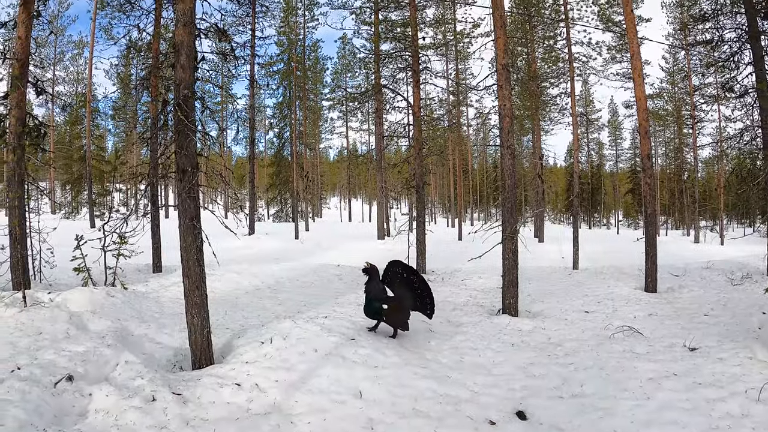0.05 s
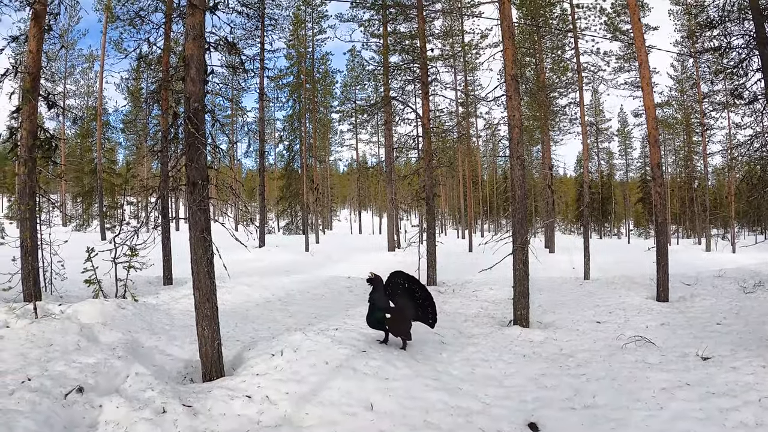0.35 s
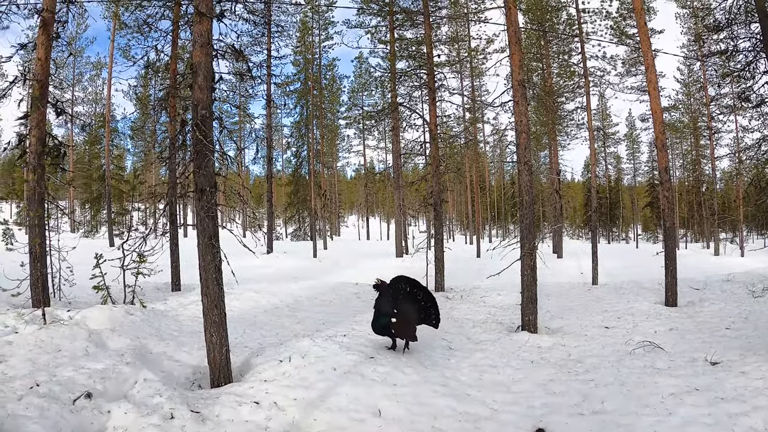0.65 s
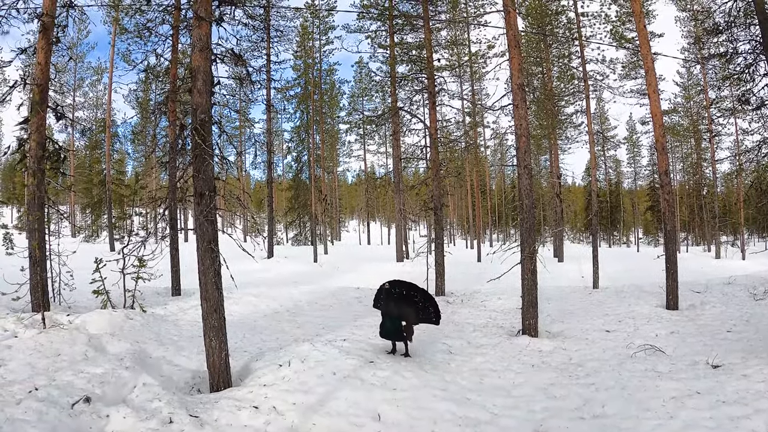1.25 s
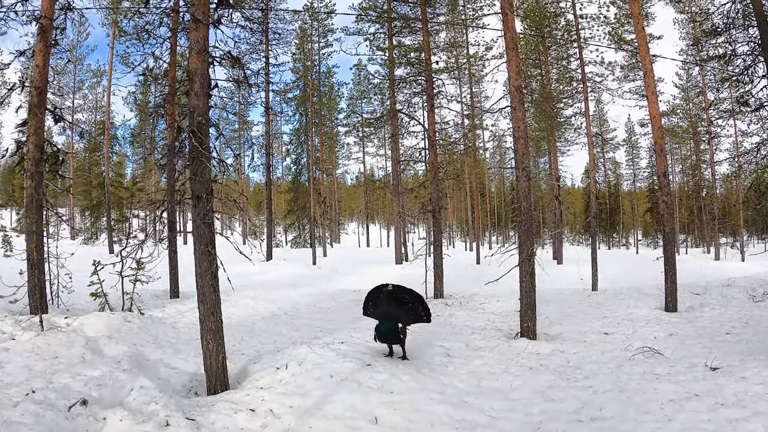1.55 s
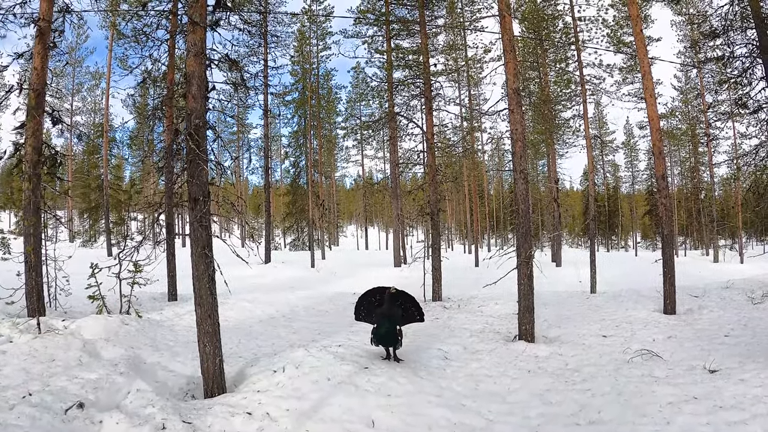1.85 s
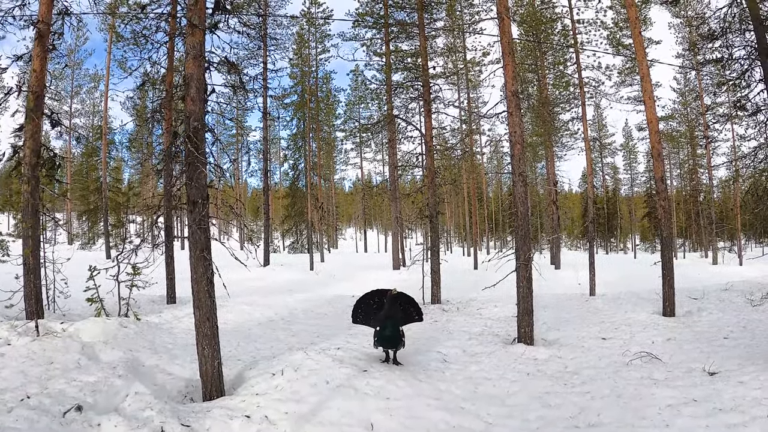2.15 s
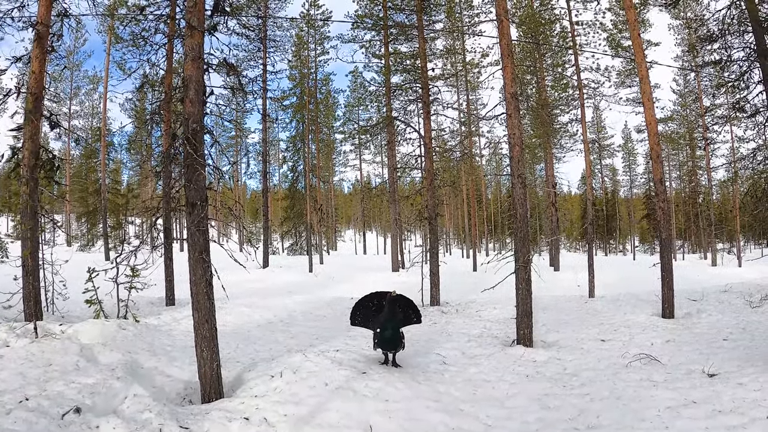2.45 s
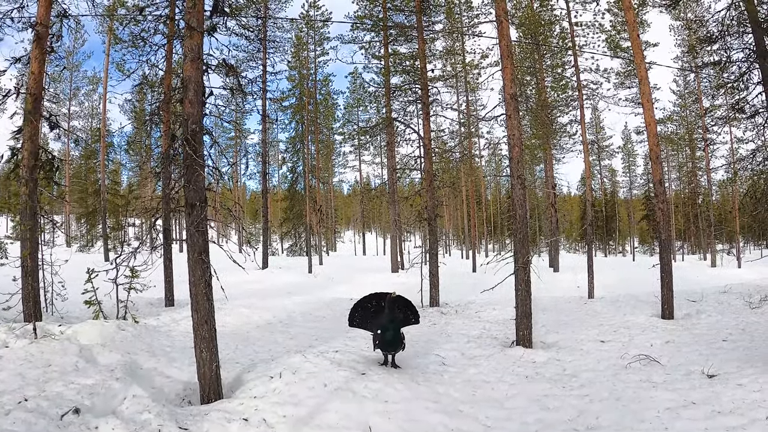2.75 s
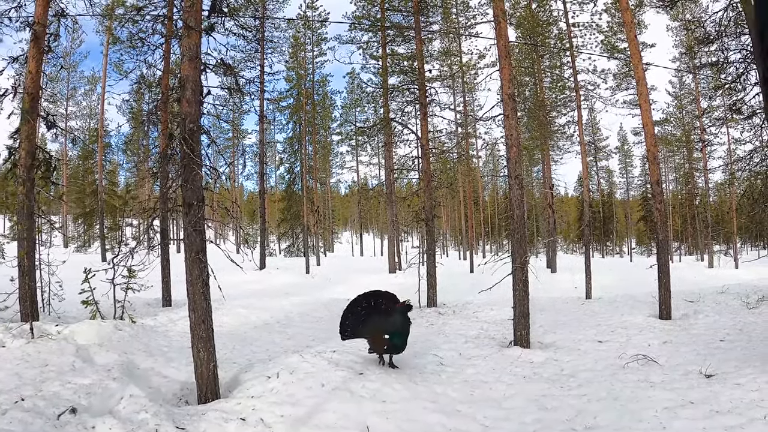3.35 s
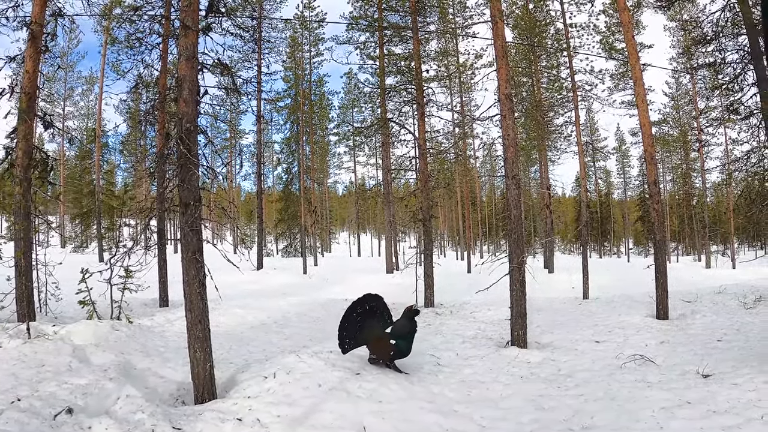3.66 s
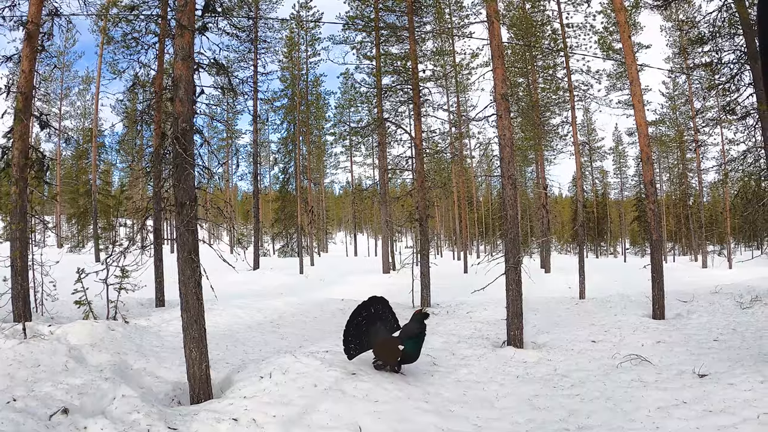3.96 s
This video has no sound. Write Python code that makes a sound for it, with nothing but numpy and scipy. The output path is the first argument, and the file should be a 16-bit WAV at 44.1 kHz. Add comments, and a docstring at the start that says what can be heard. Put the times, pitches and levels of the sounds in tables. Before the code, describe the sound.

A large forest bird's sharp, cork-like pop over low wind rumble and faint snow crunches.

```python
"""Capercaillie on old snow

A displaying capercaillie struts through a pine forest, a few metres away. One call is just ending;
the next is a cork-like pop: two snaps ring the bill over a hollow throat note, then tiny squeaks.
Feathers flick, feet crunch the crust and the trunks return a faint echo.
Wind hushes in the crowns and buffets the microphone."""
import sys
import numpy as np
from scipy import signal
from scipy.fft import rfft, irfft, next_fast_len
from scipy.io import wavfile
from scipy.ndimage import uniform_filter1d, map_coordinates

SR = 44100
rng = np.random.default_rng(int(sys.argv[2]) if len(sys.argv) > 2 else 0)


def store_pcm(level_fs):
    """Save levels as 16-bit WAV."""
    pcm = np.round(np.clip(level_fs, -1, 1) * 32767).astype(np.int16)
    wavfile.write(sys.argv[1], SR, np.atleast_2d(pcm).T)


N = 176400
LEAD_S = .05  # pre-roll for the call already under way; scene() trims it off

# gritty noise colour of the snaps and squeaks: (frequency [Hz], level [dB])
RASP = [(900, -29), (1600, -11.5), (2300, 2.5), (4200, 3), (5600, -22), (9000, -15), (15500, -28)]
# crisp noise colour of the snow crust, also used for feathers: (frequency [Hz], level [dB])
CRUST = [(700, -13.5), (1500, 2), (2800, -1), (4600, 0.5), (6000, -3), (10000, -3), (15500, -6)]


def pop():
    """Each snap is a sharp click that rings the bill; the hollow throat note swells just after it."""
    # snaps: (time [s], ring [dB], tilt [dB/octave], click [dB], throat note [dB], ring pitch [ratio])
    snaps = [(-.032, -16.5, -2, -33, -58, 1), (1.9671, -20.5, 5, -12.5, -29.5, 1.02),
             (1.9758, -22, 2.5, -33, -50, .985)]
    # resonances of the bill and throat: (frequency [Hz], level [dB], t60 [s])
    modes = [(1300, -10.5, .008), (1820, -2, .012), (2200, 5.5, .012), (2700, -4.5, .012),
             (3530, -17, .008), (4000, -9.5, .012), (4900, -17, .0098), (6150, -18.5, .009),
             (7450, -28.5, .011), (8850, -27.5, .007), (10400, -33, .006)]
    # dips between the throat's resonances: (frequency [Hz], width [Hz])
    hollows = [(1000, 150), (5650, 400), (6850, 200)]
    pivot_hz, attack_s, crack_db, crack_t60_s = 2120, .00034, -17, .0063
    click_hz, click_lag_s, click_width_s = 2600, .0006, .00014
    throat_hz, throat_lag_s, throat_length_s = 440, .0045, .007
    bill, throat = np.zeros(N), np.zeros(N)
    for s, ring_db, tilt_db, click_db, throat_db, pitch in snaps:
        since = np.arange(N) / SR - s - LEAD_S
        t, click_t = np.maximum(since, 0), since - click_lag_s
        ring = sum(amp(db + tilt_db * np.log2(hz / pivot_hz) - 60 * t / t60)
                   * np.sin(2 * np.pi * pitch * hz * t) for hz, db, t60 in modes)
        crack = amp(crack_db + tilt_db - 60 * t / crack_t60_s) * noise(RASP)
        click = np.exp(-np.abs(click_t) / click_width_s) * np.cos(2 * np.pi * click_hz * click_t)
        bill += amp(ring_db) * (ring + crack) * (1 - np.exp(-t / attack_s)) + amp(click_db) * click
        bloom = swell(s + LEAD_S + throat_lag_s, throat_length_s)
        throat += amp(throat_db) * bloom * np.sin(2 * np.pi * throat_hz * t)
    for hz, width in hollows:
        bill = signal.lfilter(*signal.iirnotch(hz, hz / width, fs=SR), bill)
    low_cut = signal.butter(2, 1290, "high", fs=SR, output="sos")  # the bill's ring keeps little below about 1.3 kHz
    return signal.sosfilt(low_cut, bill) + throat


def squeaks():
    """Very short, raspy, gliding notes with overtones shaped by the throat."""
    # squeaks: (centre [s], length [s], pitch [Hz], glide [share of pitch/s], level [dB], overtones [dB])
    notes = [(.007, .0078, 2160, 5, -28, -7.5), (.015, .0093, 2170, -3, -41.5, -24),
             (.0219, .0058, 1353, -10, -41, 2.5), (1.9917, .0058, 1770, -7, -33.5, 5),
             (2.0018, .0078, 1960, -7, -35, -2.5)]
    # how the throat passes the overtones: (frequency [Hz], gain [dB])
    formants = [(2600, 1.5), (3500, -6), (4100, -11), (5350, -18), (5900, -45), (7100, -29), (7800, -36),
                (8800, -22), (9900, -51)]
    jitter, rasp_db = .018, -23
    out, t = np.zeros(N), np.arange(N) / SR - LEAD_S
    for s, length, hz, glide, db, overtones_db in notes:
        pitch = hz * (1 + glide * np.clip(t - s, -length, length) + jitter * wobble(900))
        phase = 2 * np.pi * np.cumsum(pitch) / SR
        overtones = sum(amp(along(formants, k * hz)) * np.sin(k * phase) for k in range(2, 6))
        voice = np.sin(phase) + amp(overtones_db) * overtones + amp(rasp_db) * noise(RASP)
        out += amp(db) * swell(s + LEAD_S, length, order=4) * voice
    return out


def feathers():
    """A brief dry rustle as the neck jerks around the pop."""
    # flicks of the neck feathers: (centre [s], length [s], level [dB])
    flicks = [(1.948, .016, -67), (1.989, 0.032, -59), (2.031, .03, -65)]
    return sum(amp(db) * swell(s, length) for s, length, db in flicks) * noise(CRUST)


def steps():
    """Bursts of grains at each footfall, and a thin crackle while the bird walks."""
    # feet and wing tips crunching the crust: (centre [s], length [s], level [dB])
    crunches = [(.06, .085, -68.5), (.211, .018, -66), (.277, .024, -68), (.334, .02, -70.5),
                (.386, .005, -67), (.399, .008, -70), (.408, .0055, -62), (.528, .014, -67.5),
                (.798, .013, -58.5), (.862, .085, -71.5), (.924, .009, -65), (.94, .02, -65),
                (.976, .01, -68), (.994, .03, -70), (1.096, .005, -63), (1.106, .009, -60.5),
                (1.152, .012, -58.5), (1.179, .012, -67.5), (3.275, .01, -63), (3.291, .02, -64.5),
                (3.424, .032, -71), (3.467, .03, -68), (3.513, .008, -55.5), (3.54, .02, -65),
                (3.563, .012, -52.5), (3.798, .012, -60.5), (3.82, .035, -67.5), (3.9, .11, -68),
                (3.931, .022, -66)]
    # spells of walking with rustling feathers: (start [s], end [s], level [dB])
    walks = [(0, 0.64, -86), (0.777, 1.238, -81.5), (3.397, 4.04, -81)]
    t = np.arange(N) / SR
    pressure = sum(amp(db) * swell(s, length) for s, length, db in crunches)
    walking = sum(amp(db) * ((t > start) & (t < end)) for start, end, db in walks)
    crunch = pressure * grains(per_s=4500, spread_db=2)
    crackle = uniform_filter1d(walking, size=1500) * grains(per_s=1100, spread_db=5)
    return crunch + crackle


def grains(per_s, spread_db, colour_db=3):
    """Ice grains of random size break at random moments; their colour shifts from clump to clump."""
    sizes = amp(spread_db * np.minimum(rng.exponential(size=N), 4))
    breaks = (rng.random(N) < per_s / SR) * sizes * rng.choice([-1, 1], N)
    spectra = signal.stft(breaks, nperseg=256)[2]
    clumps = uniform_filter1d(rng.standard_normal(spectra.shape), size=5, axis=0)
    clumps = unit(uniform_filter1d(clumps, size=6, axis=1))
    return coloured(signal.istft(spectra * amp(colour_db * clumps), nperseg=256)[1][:N], CRUST)


def crust_ticks(t60_s=.007, ring_db=-3):
    """Single bits of crust snap, each a tiny crack with a brief ring of its own."""
    # snapping bits: (time [s], level [dB], ring [Hz])
    ticks = [(.0915, -61, 5500), (.256, -66, 5000), (.584, -73, 9000), (.625, -72, 5500), (.658, -68, 9200),
             (.7195, -69, 12000), (.807, -61, 7000), (.851, -59, 7500), (.9045, -57, 6000),
             (1.055, -65, 5200), (1.1415, -63, 7000), (2.301, -72, 7500), (2.614, -74, 8000),
             (3.087, -72, 8500), (3.096, -73, 7000), (3.229, -70, 6500), (3.5515, -56, 6500),
             (3.9205, -57, 6500), (3.9885, -61, 10000)]
    out, t = np.zeros(N + SR), np.arange(SR // 50) / SR
    cracks = noise(CRUST)
    for k, (s, db, hz) in enumerate(ticks):
        snap = cracks[k * len(t):][:len(t)] + amp(ring_db) * np.sin(2 * np.pi * hz * t)
        out[round(s * SR):][:len(t)] += amp(db - 60 * t / t60_s) * snap
    return out[:N]


def forest_echo(call):
    """Near trunks scatter the call; one far trunk and a faint tail answer more when the bird faces away."""
    # decay of the forest's tail: (frequency [Hz], t60 [s])
    decay = [(300, .3), (2200, .7), (5000, .25), (12000, .1)]
    # the bird calls sideways into the trees, then turns to the microphone: (time [s], extra echo [dB])
    facing = [(0, 3), (1.5, 0)]
    scatter_db, scatter_t60_s = -15.5, .09
    tail_db, trunk_db, trunk_delay_s = -33, -40, .16
    hz, t, spectra = signal.stft(rng.standard_normal(SR // 2), SR, nperseg=256)
    tail = signal.istft(spectra * amp(-60 * t / along(decay, hz)[:, None]), SR, nperseg=256)[1]
    near = rng.standard_normal(len(tail)) * amp(-60 * np.arange(len(tail)) / SR / scatter_t60_s)
    far = amp(tail_db) * tail / np.linalg.norm(tail)
    far[round(trunk_delay_s * SR)] += amp(trunk_db)
    scatter = signal.fftconvolve(call, amp(scatter_db) * near / np.linalg.norm(near))
    echo = signal.fftconvolve(call * amp(curve(facing)), far)
    return (scatter + echo)[:N]


def crown_hush(gain_db=1, waver_db=.33):
    """Wind in the pine crowns: a soft, steady bed that barely wavers."""
    # colour of the hush: (frequency [Hz], level [dB])
    crowns = [(30, -2.5), (100, -4), (170, -3.5), (260, -3.5), (400, 1), (520, -2), (700, -6.5), (1000, -9),
              (1500, -15.5), (2400, -21), (3300, -30), (4500, -38.5), (6500, -45.5), (10000, -51),
              (15500, -60)]
    # its slow drift: (time [s], relative level [dB])
    drift = [(0.0, -55), (1.0, -56), (2.67, -55.5), (2.97, -56), (3.95, -54.5)]
    return amp(curve(drift) + gain_db + waver_db * wobble(17)) * noise(crowns)


def wind_buffet(breeze_db=-45, gain_db=15.5):
    """Gusts on top of a steady breeze hit the microphone as a deep rumble."""
    # gusts: (centre [s], length [s], relative level [dB])
    gusts = [(0.039, 0.062, -26), (0.22, 0.23, -44), (0.468, 0.12, -38), (0.567, 0.19, -39.5),
             (1.16, 0.24, -37.5), (1.452, .12, -34), (1.611, 0.098, -29.5), (1.761, 0.16, -34.5),
             (2.122, 0.15, -35), (2.419, 0.19, -34), (2.795, 0.11, -43), (3.15, 0.22, -38),
             (3.385, 0.098, -46.5), (3.897, 0.19, -32.5)]
    # colour of the rumble: (frequency [Hz], level [dB])
    rumble = [(2, -3), (6, 12.5), (10, 2.5), (20, 1), (28, -11), (40, -28), (60, -29.5), (100, -43),
              (200, -62.5), (600, -85), (2000, -120)]
    force = amp(breeze_db) + sum(amp(db) * swell(s, length, order=4) for s, length, db in gusts)
    return amp(gain_db) * force * noise(rumble)


def amp(db):
    """Decibels to gain."""
    return 10 ** (np.asarray(db) / 20)


def unit(x):
    """x scaled to rms 1."""
    return x / np.sqrt(np.mean(x ** 2) + 1e-20)


def along(points, hz):
    """(Hz, value) points read at hz on a log axis."""
    freqs, values = np.transpose(points)
    return np.interp(np.log(hz + 1), np.log(freqs + 1), values)


def curve(rows):
    """(s, value) points as one value per sample."""
    return np.interp(np.arange(N) / SR, *np.transpose(rows))


def wobble(rate):
    """A smooth random curve, rate knots a second."""
    return map_coordinates(rng.standard_normal(int(N * rate / SR) + 4), [np.arange(N) * rate / SR])


def swell(centre, length, order=2):
    """A rise and fall about length seconds wide; a higher order gives a flatter top."""
    return np.exp(-np.abs(2 * (np.arange(N) / SR - centre) / length) ** order)


def filtered(x, response):
    """x through a gain that depends on frequency."""
    size = next_fast_len(N + SR // 2)
    return irfft(rfft(x, size) * response(np.fft.rfftfreq(size, 1 / SR)), size)[:N]


def coloured(x, spectrum):
    """x shaped by (Hz, dB) points, at rms 1."""
    return unit(filtered(x, lambda hz: amp(along(spectrum, hz))))


def noise(spectrum):
    """Noise of the given colour, at rms 1."""
    return coloured(rng.standard_normal(N), spectrum)


def scene():
    """The bird among the trees, in the wind, in mono."""
    call = pop() + squeaks()
    lead = round(LEAD_S * SR)
    bird = np.pad((call + forest_echo(call))[lead:], (0, lead))
    return (bird + feathers() + steps() + crust_ticks() + crown_hush() + wind_buffet())[None]


def record(dry):
    """The microphone keeps nothing above its band limit."""
    top_hz = 15850
    return np.array([filtered(x, lambda hz: hz < top_hz) for x in dry])


dry = scene()
out = record(dry)
store_pcm(out)
```